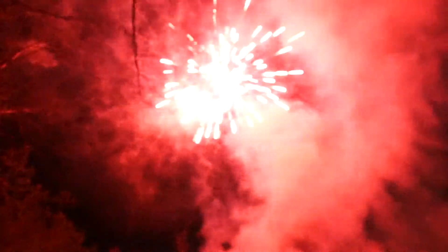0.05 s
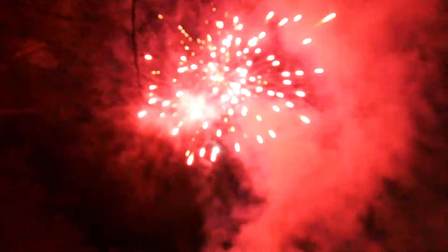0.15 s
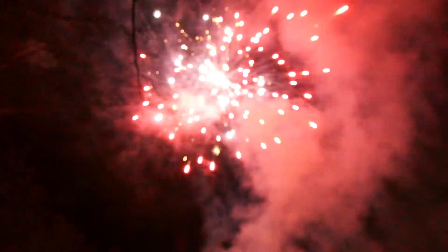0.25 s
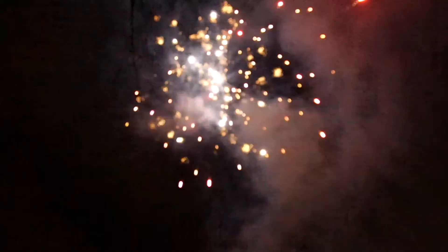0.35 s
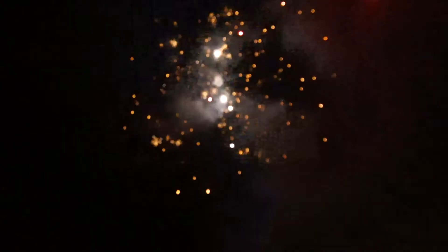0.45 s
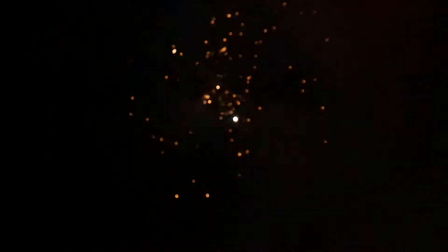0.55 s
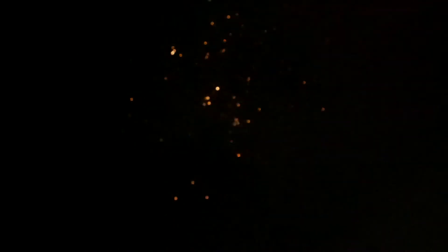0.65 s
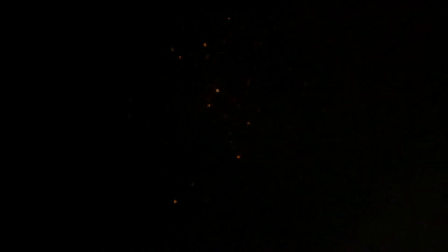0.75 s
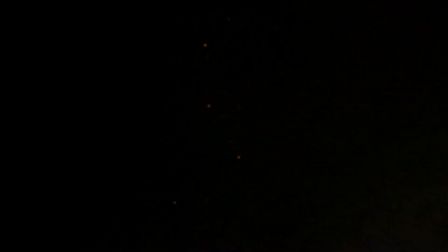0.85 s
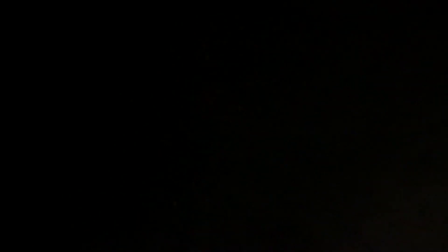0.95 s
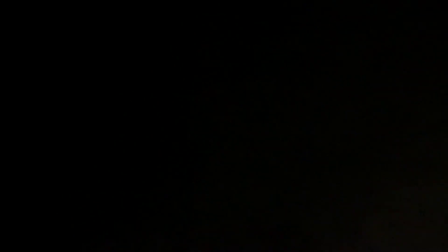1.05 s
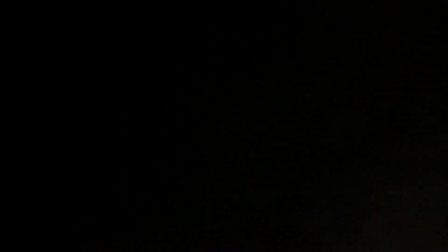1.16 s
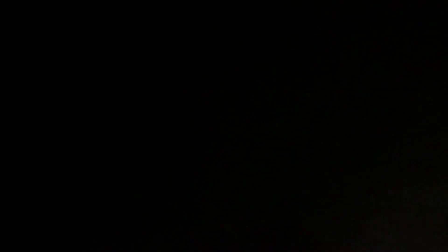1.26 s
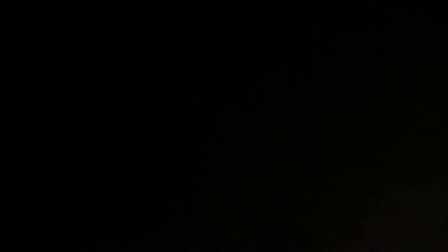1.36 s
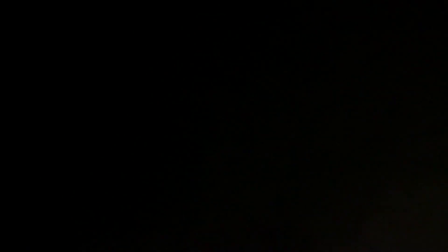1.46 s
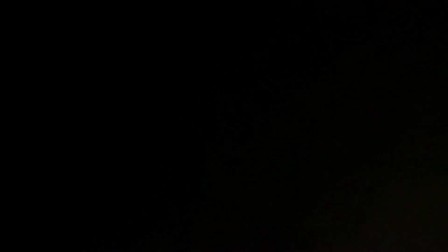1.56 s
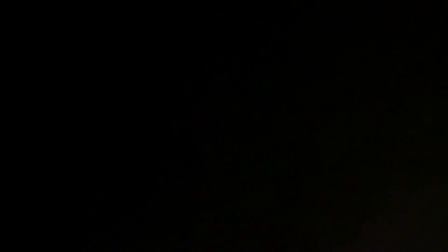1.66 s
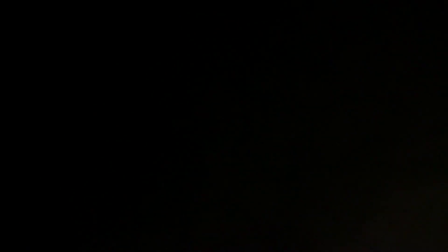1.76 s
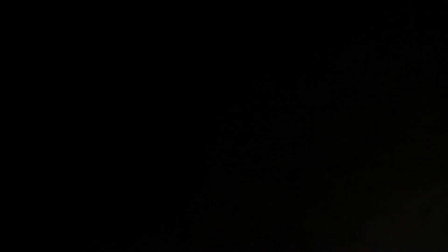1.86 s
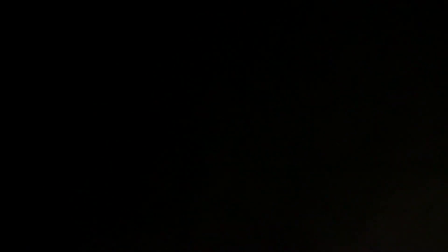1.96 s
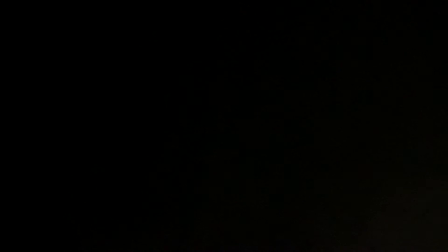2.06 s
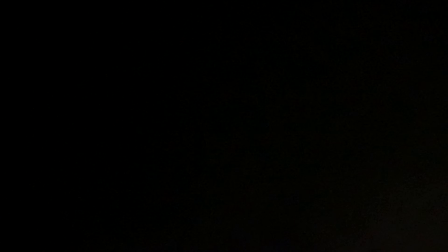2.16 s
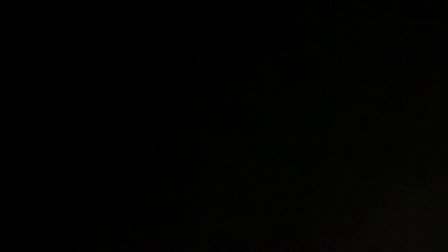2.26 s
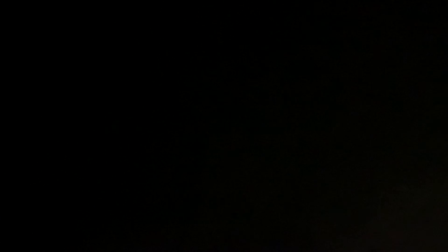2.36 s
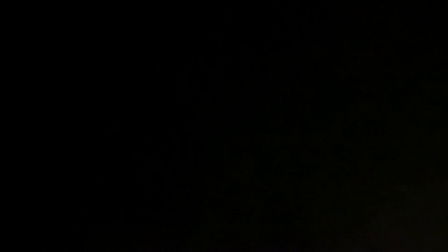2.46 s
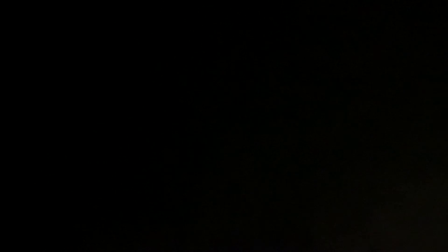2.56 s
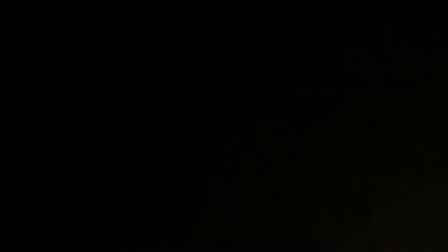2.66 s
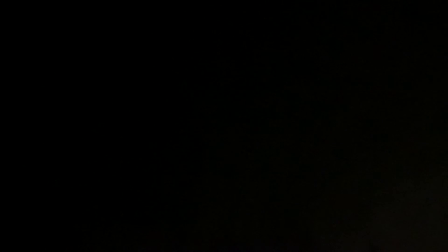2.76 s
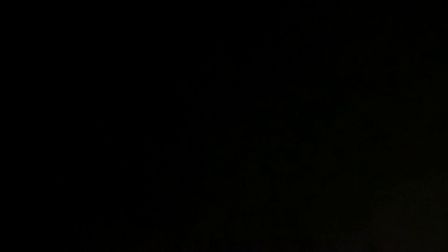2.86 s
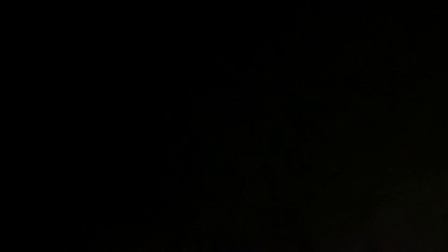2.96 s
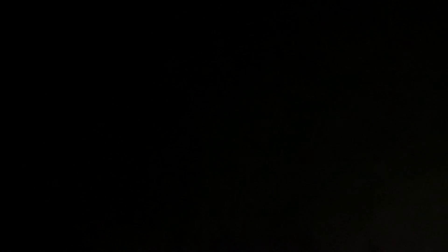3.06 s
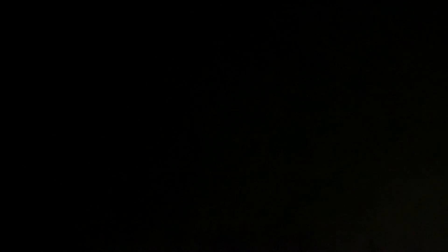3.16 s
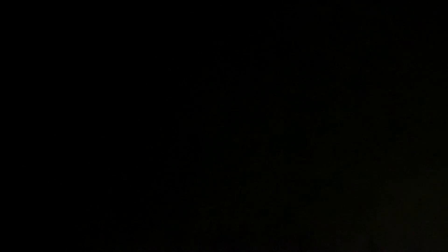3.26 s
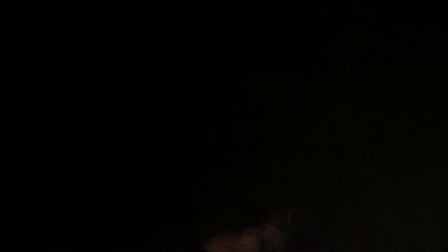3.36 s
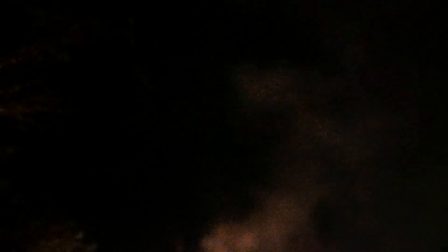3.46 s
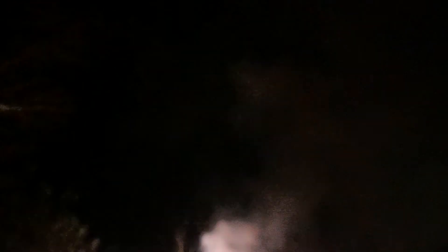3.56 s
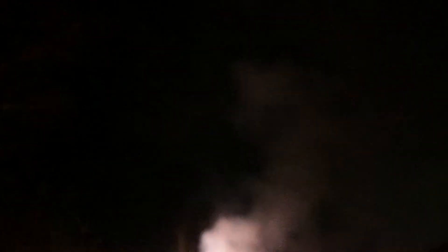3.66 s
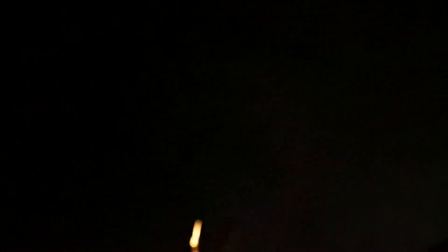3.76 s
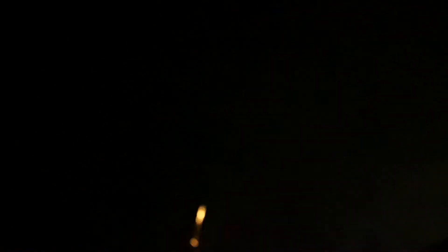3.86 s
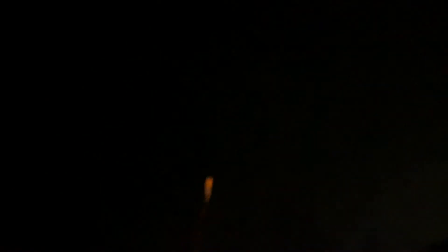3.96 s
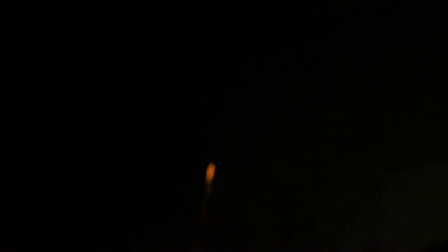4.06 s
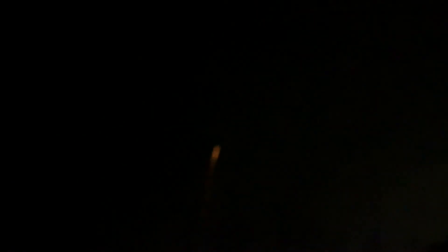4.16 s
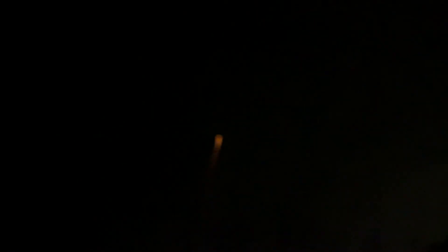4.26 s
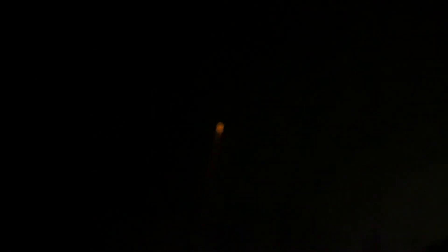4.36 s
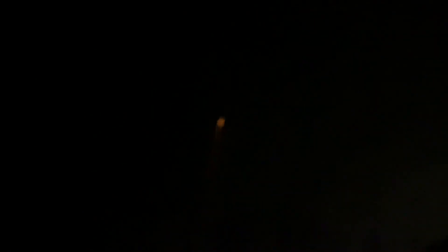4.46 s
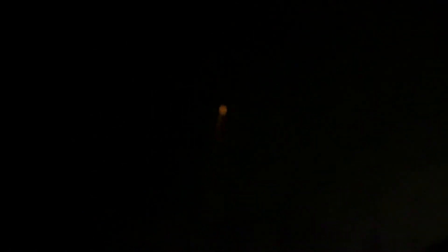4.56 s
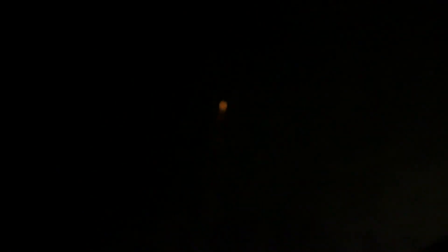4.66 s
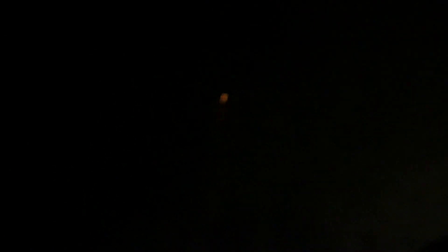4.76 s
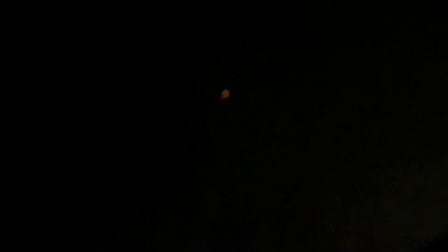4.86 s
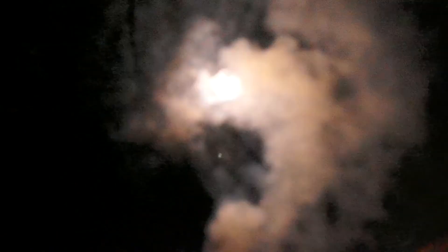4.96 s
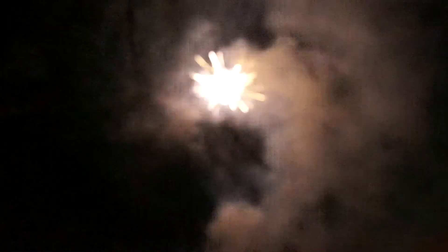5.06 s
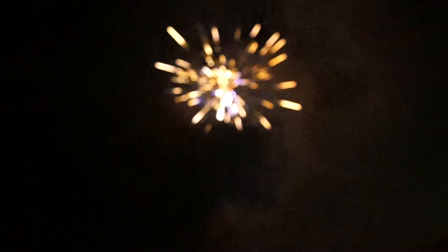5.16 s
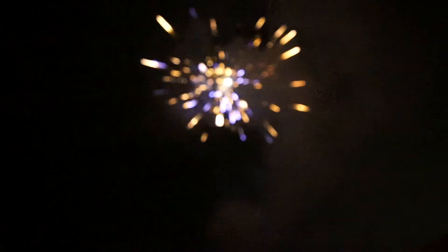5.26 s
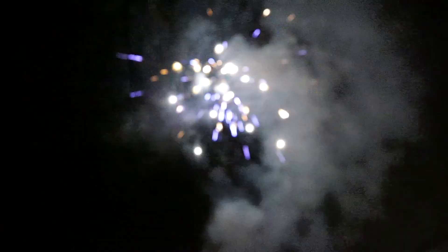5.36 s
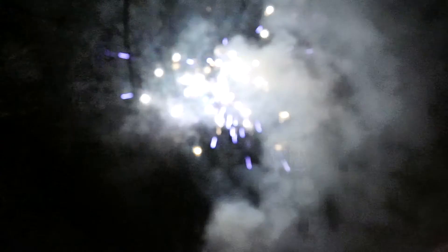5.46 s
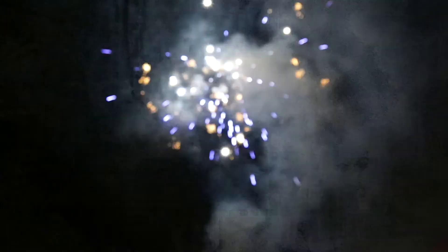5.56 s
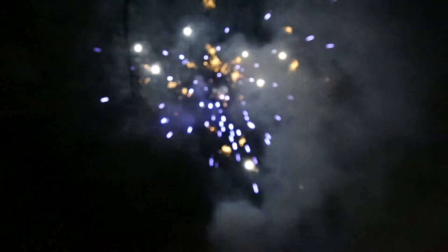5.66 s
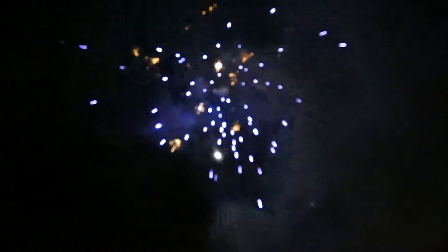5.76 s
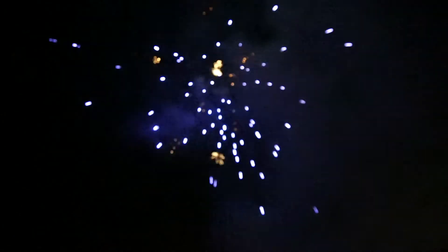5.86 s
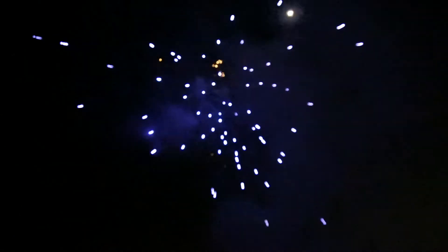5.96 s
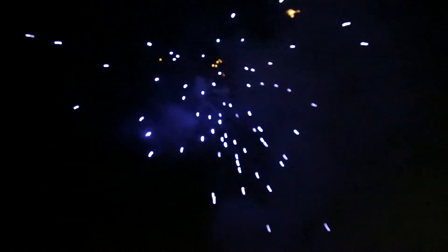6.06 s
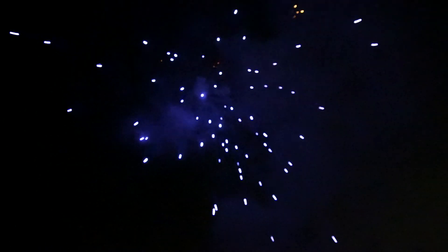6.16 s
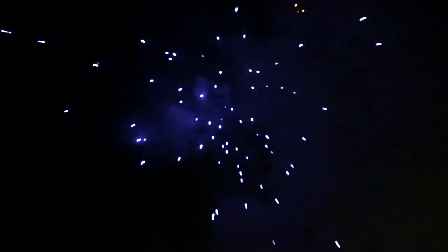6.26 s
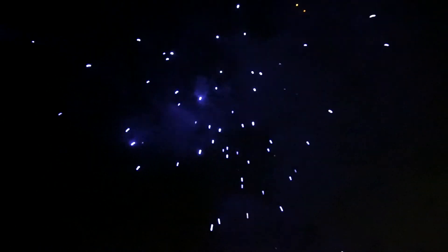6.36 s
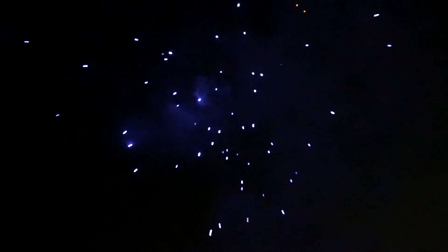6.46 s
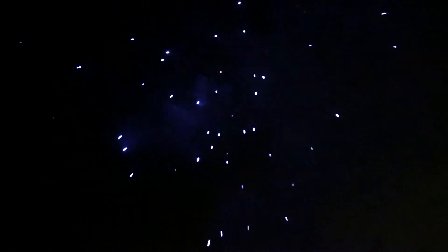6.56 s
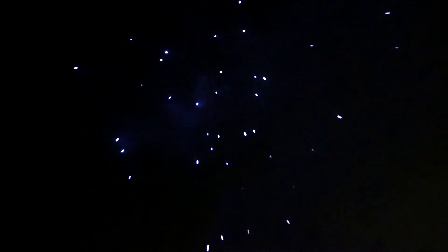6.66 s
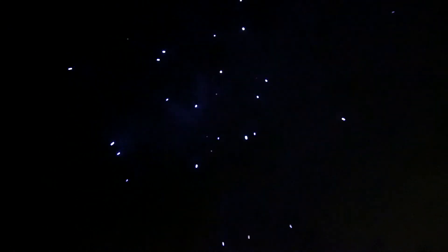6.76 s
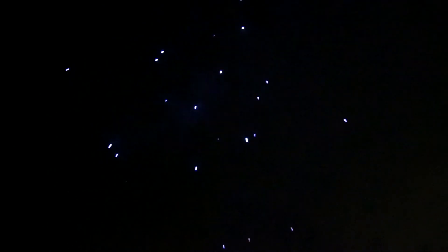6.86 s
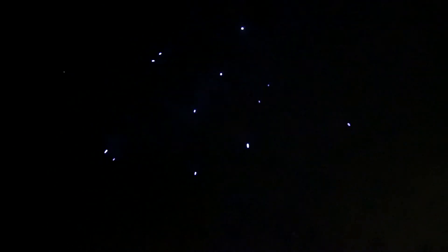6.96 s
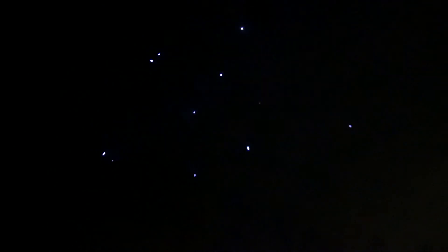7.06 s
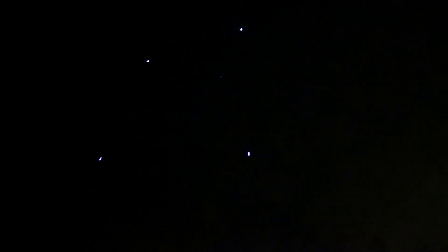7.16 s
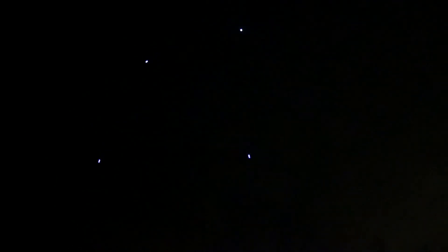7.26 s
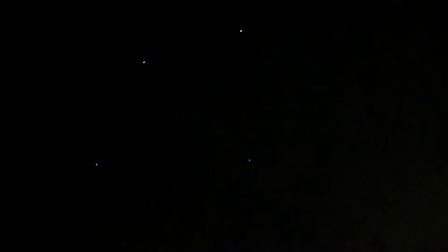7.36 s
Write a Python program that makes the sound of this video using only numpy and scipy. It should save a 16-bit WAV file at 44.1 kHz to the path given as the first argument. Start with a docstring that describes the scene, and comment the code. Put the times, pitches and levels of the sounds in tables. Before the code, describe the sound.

Fireworks heard from the ground among trees. The roar and rapid crackle of a burst come first, trailing off into a long rumble with light ticks of falling debris. A faint motor buzz by the microphone and a soft fuse hiss lead into a loud launch bang. Both return just before the shell bursts overhead with a hard crack, a roar and thick crackling that fades over the hills.

```python
"""Fireworks over wooded ground at night. A shell has just burst: near trees scatter its shock wave into
a roar, far hills into a rumble, duller with distance. Its stars pop in a swarm, then debris ticks down.
A small lens motor buzzes and a fuse fizzes until a mortar fires at 3.4 s. Motor and fuse return;
the shell bursts overhead at 5.1 s, roars and crackles. Last come stray ticks and the motor again."""
import sys
import numpy as np
from scipy import signal
from scipy.fft import rfft, irfft, next_fast_len
from scipy.io import wavfile
from scipy.ndimage import uniform_filter1d

SR = 44100
rng = np.random.default_rng(int(sys.argv[2]) if len(sys.argv) > 2 else 0)


def persist_wave(psi):
    """Save psi, clipped to +-1, as 16-bit WAV."""
    counts = np.round(np.clip(psi, -1, 1) * 32767).astype(np.int16)
    wavfile.write(sys.argv[1], SR, np.atleast_2d(counts).T)


N = 326781
T = np.arange(N) / SR

# Table levels are relative, ahead of gains and filters.
# stereo width of scattered sound: f/Hz, side minus mid/dB
DIFFUSE_WIDTH = [(60, -10), (150, -18.5), (300, -20.5), (600, -11), (1200, -5), (3000, -2.5), (9000, 2)]
# lens motor running: start/s, stop/s, level/dB
LENS_RUNS = [(3, 3.45, -37.5), (4.921, 5.11, -36.5), (7.317, 7.5, -42)]
# motor housing response: f/Hz, level/dB
HOUSING_COLOUR = [(40, -64.5), (150, -19), (350, -21), (640, 2), (1150, -7), (1600, 4), (1880, 0),
                  (2120, 1.5), (2300, -9), (3450, -9), (4200, -12.5), (5200, -26), (7000, -21),
                  (11000, -37)]
# mortar and shell fuses: end/s, final level/dB, growth/(dB/s)
FUSE_BURNS = [(3.43, -57.5, 26.5), (5.08, -57.5, 14.5)]
# fuse hiss spectrum: f/Hz, level/dB
FUSE_COLOUR = [(40, -29), (200, -31), (1000, 4.5), (3000, 7), (6500, 2.5), (9000, -2), (11000, -5.5)]
# debris in the leaves: t/s, level/dB, f/Hz, t60/s
LEAF_TICKS = [(1.473, -33, 3130, 0.032), (1.7748, -53, 7130, .03), (2.0045, -47, 4900, 0.16),
              (2.384, -43, 2960, .04), (2.4280, -49, 4870, 0.41), (3.3320, -32.5, 9000, 0.027),
              (4.1500, -41.5, 6900, 0.11), (4.5462, -34.5, 7950, 0.031), (4.636, -37, 6300, 0.21),
              (6.125, -35, 5300, 0.1), (6.565, -51, 7070, 0.17), (7.359, -39, 4040, 0.02)]
# ringing fragments: t/s, level/dB, low mode/Hz, high mode/Hz, high re low/dB, t60/s
FRAGMENT_CLINKS = [(4.518, -23, 2000, 3171, -9, 0.012), (4.7890, -44.5, 2630, 5000, 0, 0.11),
                   (4.873, -34.5, 3570, 6690, -11, 0.077)]
# big star pops: t/s, level/dB
BIG_STARS = [(.3263, -7), (.4770, -2.5), (.4935, -4.5), (.5112, -6), (.5619, -5), (.611, -1), (.617, -4),
             (.7253, 0), (5.403, -4), (5.4877, -2), (5.5109, -5), (5.7232, -6), (5.744, -5), (5.7741, -5),
             (5.7787, -3), (5.788, -6.5), (5.824, -7), (5.8483, -5), (5.8558, -5), (5.861, -5),
             (5.9508, -5), (5.9726, -12)]
# small stars, per shell: start/s, build-up/s, thinning from/s, rate/(1/s), level/dB
STAR_SWARMS = [(.31, .11, .497, 500, -7.2), (5.46, .03, 5.678, 365, -6.5)]
# crackle echo spectrum: f/Hz, level/dB
CRACKLE_ECHO_COLOUR = [(40, 4), (400, 11.5), (1000, 1.5), (2000, -2.5), (4000, 2.5), (7000, 5.5),
                       (11000, -3)]
# fresh roar of a shell overhead: f/Hz, level/dB
SHELL_ROAR_COLOUR = [(40, -59), (100, -45), (160, -21), (220, -9), (290, -2.5), (420, -0.5), (620, -3.5),
                     (880, -.5), (1400, -4), (2000, -6), (2700, -6.5), (4500, -11), (7000, -15.5),
                     (11000, -23)]
# fresh roar of the mortar on the ground: f/Hz, level/dB
MORTAR_ROAR_COLOUR = [(40, -49), (100, -36), (160, -20), (220, -7), (350, -4), (560, -1.5), (780, 1.5),
                      (1100, -2.5), (1500, -4), (2100, -7.5), (3000, -7.5), (4500, -14.5), (7000, -20),
                      (11000, -28.5)]
# echoes of first shell, mortar, second shell: t/s, first echoes/dB, swell/s, roar/dB, sag/(dB/s),
# roar length/s, rumble/dB, air dulling/(dB/s), ground bounce lag/s
BLAST_ECHOES = [(-0.12, -12.5, .145, -20, 1, 0.459, -29.5, 2.5, 0.0023),
                (3.447, -12, 0.056, -19, 27.5, 1.4, -36.5, 3, 0.0027),
                (5.097, -12, 0.064, -20, 6.5, .385, -32.5, 3, .0023)]
# shock fronts and first hard reflections: t/s, level/dB, length/ms
SHOCK_FRONTS = [(3.4480, -1.5, 0.88), (3.4747, -9, 1), (3.5323, -8, 0.67), (5.0966, -1, 0.72),
                (5.099, -8, 0.61), (5.1056, -3, 0.98), (5.145, 0.5, 0.62)]


def undb(db):
    return 10 ** (np.asarray(db) / 20)


def add(out, start_s, sound):
    """Mix in at start_s."""
    i = int(start_s * SR)
    out[:, i:i + sound.shape[-1]] += sound[..., :N - i]


def colour_db(points, hz):
    """Spectrum interpolated over log frequency."""
    knots_hz, db = np.transpose(points)
    return np.interp(np.log(hz + 1), np.log(knots_hz), db)


def paint(x, points):
    """Filter by a spectrum."""
    size = next_fast_len(x.shape[-1])
    gain = undb(colour_db(points, np.fft.rfftfreq(size, 1 / SR)))
    return irfft(rfft(x, size) * gain, size)[..., :x.shape[-1]]


def butter(x, hz, kind, order=2):
    return signal.sosfilt(signal.butter(order, hz, kind, fs=SR, output="sos"), x + 1e-18)


def pan(left_minus_right_db):
    return undb(np.array([[1], [-1]]) * left_minus_right_db / 2)


def diffuse(size=N):
    """Noise from all around: ears alike in the bass, unrelated in the treble."""
    mid, side = rng.standard_normal((2, size))
    return mid + paint(side, DIFFUSE_WIDTH) * np.array([[1], [-1]])


def wander(rate_hz):
    """Interpolated random control signal."""
    knots = rng.standard_normal(N // 100)
    return 0.68 * np.interp(T * rate_hz, np.arange(len(knots)), knots)


def decay(t60_s):
    """Exponential envelope, 0.5 s long."""
    return np.exp(-np.log(1000) * T[:SR // 2] / t60_s)


def lens_motor(turn_hz=36.36, mesh_hz=143, mesh_depth=.29, scrape_db=7, rise_s=.023):
    """Gears in a small housing repeat one rattle per turn, with loose scraping on top."""
    one_turn = rng.standard_normal(SR // 10)
    rattle = one_turn[np.arange(N) % int(SR / turn_hz)]
    mesh = 1 + mesh_depth * np.sin(2 * np.pi * mesh_hz * T)
    buzz = paint((rattle + undb(scrape_db) * diffuse()) * mesh, HOUSING_COLOUR)
    running = sum(undb(db) * np.clip((T - start_s) / rise_s, 0, 1) * (T < stop_s)
                  for start_s, stop_s, db in LENS_RUNS)
    return buzz / buzz.std() * running


def fuses(floor_db=-82.5, spark_fade_db_per_s=14):
    """Sputtering hiss grows as each fuse burns down and fades with the sparks."""
    hiss = diffuse() * undb(5 * wander(500) + 2 * wander(70))  # grain, sputter
    hiss = paint(hiss, FUSE_COLOUR)
    hiss /= butter(hiss.mean(0), (7000, 11000), "band", order=4).std()
    power = undb(floor_db) ** 2
    for end_s, db, growth_db_per_s in FUSE_BURNS:
        before_db = growth_db_per_s * np.maximum(end_s - T, 0)
        after_db = spark_fade_db_per_s * np.maximum(T - end_s, 0)
        power = power + undb(db - before_db - after_db) ** 2
    return hiss * np.sqrt(power)


def debris(tick_gain_db=-8, jitter_rad=.11):
    """Falling bits of shell tick in the leaves; a few hard ones ring."""
    out = np.zeros((2, N))
    for t_s, db, hz, t60_s in LEAF_TICKS:
        rustle = butter(diffuse(SR // 2), (hz * .55, hz * 1.7), "band")
        add(out, t_s, undb(db + tick_gain_db) * decay(t60_s) * rustle / rustle.std())
    for t_s, db, low_hz, high_hz, high_db, t60_s in FRAGMENT_CLINKS:
        low, high = (np.sin(np.cumsum(2 * np.pi * hz / SR + jitter_rad * rng.standard_normal(SR // 2)))
                     for hz in (low_hz, high_hz))
        add(out, t_s, undb(db) * decay(t60_s) * (low + undb(high_db) * high))
    return butter(out, 600, "high")


def echoes(colour, air_db_per_s, bounce_s=.002365, comb_db=2, comb_top_hz=1600, grazing_s=.68,
           patch_db=.97, size=4 * SR):
    """Dense echoes: later ones cross more air and graze the ground, whose bounce combs the lows."""
    hz, age_s, spectra = signal.stft(diffuse(size), SR, nperseg=1024)
    hz = hz[:, None]
    fresh = undb(colour_db(colour, hz))
    fresh /= np.sqrt(np.mean(fresh ** 2 * (hz > 200) * (hz < 900)))
    air_db = air_db_per_s * age_s * ((hz / 1e3) ** 1.299 - .5)
    comb = np.cos(2 * np.pi * hz * bounce_s) * np.exp(-(hz / comb_top_hz) ** 2)
    ground_db = comb_db * comb * np.tanh(age_s / grazing_s)
    patches = rng.standard_normal(spectra.shape[1:])  # each clump of trees favours its own pitches
    patches = uniform_filter1d(uniform_filter1d(patches, size=7, axis=0), size=3, axis=1)
    gain = fresh * undb(ground_db - air_db + patch_db * patches / patches.std())
    return signal.istft(spectra * gain, SR)[1][:, :size]


def shock_waves(times_s, db, length_ms, spread_db, spread_s, front_s=14e-6, rear_s=50e-6):
    """N-shaped pressure pulses, steep front and softer rear, each from its own direction."""
    out = np.zeros((2, N))
    bearing = rng.standard_normal((len(times_s), 1))
    index = np.clip((times_s[:, None] * SR).astype(int) + np.arange(-48, 48), 0, N - 1)
    half_s = length_ms[:, None] / 2e3
    for ear, side in zip(out, (1, -1)):
        t_s = index / SR - times_s[:, None] + side * bearing * spread_s
        front = .5 + .5 * np.tanh((half_s + t_s) / front_s)
        rear = .5 + .5 * np.tanh((half_s - t_s) / rear_s)
        gain = undb(db[:, None] + side * bearing * spread_db)
        np.add.at(ear, index, t_s / half_s * front * rear * gain)
    return out


def swarm(start_s, build_s, thin_from_s, rate_per_s, level_db, thinning_s=.025, scatter_db=2,
          median_ms=.23, straggler_share=.4, straggler_s=.14, straggler_db=-4.5, fade_db_per_s=30):
    """Small stars build up, hold, then leave weak stragglers. Rows: t/s, level/dB, length/ms."""
    timing, strength, length = rng.standard_normal((400, 3)).T
    late_s = np.maximum(T - thin_from_s, 0)
    full = np.exp(-late_s / thinning_s)
    stragglers = straggler_share * np.exp(-late_s / straggler_s)
    density = np.clip((T - start_s) / build_s, 0, 1) * np.maximum(full, stragglers)
    pops_due = np.cumsum(rate_per_s * density) / SR
    turn = np.arange(len(timing)) + 1 + .8 * timing
    keep = (turn > 0) & (turn < pops_due[-1] - 1)
    at = np.searchsorted(pops_due, turn[keep])
    db = level_db + straggler_db * (1 - full[at]) - fade_db_per_s * late_s[at]
    return np.c_[T[at], db + scatter_db * strength[keep], median_ms * np.exp(.36 * length[keep])]


def big_stars(length_at_0db_ms=.34):
    """A stronger charge makes a longer shock wave. Rows: t/s, level/dB, length/ms."""
    times_s, db = np.transpose(BIG_STARS)
    return np.c_[times_s, db, length_at_0db_ms * np.sqrt(undb(db))]


def star_pops(times_s, db, length_ms, bounce_s=.0098, bounce_db=-10):
    """Each star sends a tiny shock wave, heard direct and off the ground."""
    lag_s = bounce_s * (1 + .081 * rng.standard_normal(900)[:len(times_s)])
    direct = shock_waves(times_s, db, length_ms, spread_db=-.3, spread_s=8e-6)
    bounced = shock_waves(times_s + lag_s, db + bounce_db, length_ms, spread_db=2.5, spread_s=30e-6)
    return direct + bounced


def crackle(gain_db=1.5, echo_db=-1.85, rise_s=.0058, fall_s=.22, sky_parts=3):
    """Stars pop in several parts of the sky; trees smear them into a hiss that dulls and fades."""
    stars = np.vstack([big_stars()] + [swarm(*row) for row in STAR_SWARMS])
    out = np.zeros((2, N))
    for part in range(sky_parts):
        pops = star_pops(*stars[part::sky_parts].T)
        pops = undb(gain_db) * butter(butter(pops, 600, "high", order=1), 280, "high")
        tail = echoes(CRACKLE_ECHO_COLOUR, air_db_per_s=5, size=3 * SR)
        age_s = T[:tail.shape[1]]
        tail *= (1 - np.exp(-age_s / rise_s)) / (1 + age_s / fall_s) ** 1.06
        tail *= undb(echo_db) / np.sqrt(np.sum(tail[0] ** 2))
        out += pops + signal.fftconvolve(pops.mean(0)[None], tail, axes=1)[:, :N]
    return out


def roars(release_db_per_s=160, rumble_fade_db_per_s=6, gain_db=-1.35):
    """Near trees roar until the blast has passed them; far hills add a slowly fading rumble."""
    out = np.zeros((2, N))
    for row, colour in zip(BLAST_ECHOES, (SHELL_ROAR_COLOUR, MORTAR_ROAR_COLOUR, SHELL_ROAR_COLOUR)):
        start_s, early_db, swell_s, roar_db, sag_db_per_s, roar_s, rumble_db, air_db_per_s, lag_s = row
        sound = echoes(colour, air_db_per_s, bounce_s=lag_s)
        age_s = T[:sound.shape[1]]
        swell_db = early_db * (1 - np.clip(age_s / swell_s, 0, 1) ** 3)
        sag_db = sag_db_per_s * np.maximum(age_s - swell_s, 0)
        release_db = release_db_per_s * np.maximum(age_s - roar_s, 0)
        flutter_db = .5 * wander(35)[:len(age_s)]
        trees = undb(roar_db - sag_db - release_db)
        hills = undb(rumble_db - rumble_fade_db_per_s * age_s)
        sound *= np.hypot(trees, hills) * undb(swell_db + flutter_db + gain_db)
        add(out, max(start_s, 0), sound[:, start_s + age_s >= 0])
    return out


def blasts(low_cut_hz=330, gain_db=-1):
    """Direct shock waves of mortar and second shell, with their first reflections."""
    waves = shock_waves(*np.transpose(SHOCK_FRONTS), spread_db=1.5, spread_s=10e-6)
    return undb(gain_db) * butter(waves, low_cut_hz, "high", order=3)


def scene(fresh_pan_db=1.1):
    """Heard from the ground: fresh sound leans left, late echoes come from all around."""
    starts_s = np.array(BLAST_ECHOES)[:, 0]
    age_s = T - starts_s[np.searchsorted(starts_s, T) - 1]
    sky = (roars() + blasts() + crackle()) * pan(fresh_pan_db * np.exp(-age_s ** 2))
    return sky + lens_motor() * pan(.21) + fuses() + debris()


def record(dry, ceiling=.7, low_cut_hz=100, high_cut_hz=11100):
    """The microphone rounds the hardest peaks; deep bass and top are cut."""
    rounded = butter(ceiling * np.tanh(dry / ceiling), low_cut_hz, "high", order=1)
    return signal.sosfilt(signal.ellip(12, .2, 70, high_cut_hz, fs=SR, output="sos"), rounded)


dry = scene()
out = record(dry)
persist_wave(out)
```